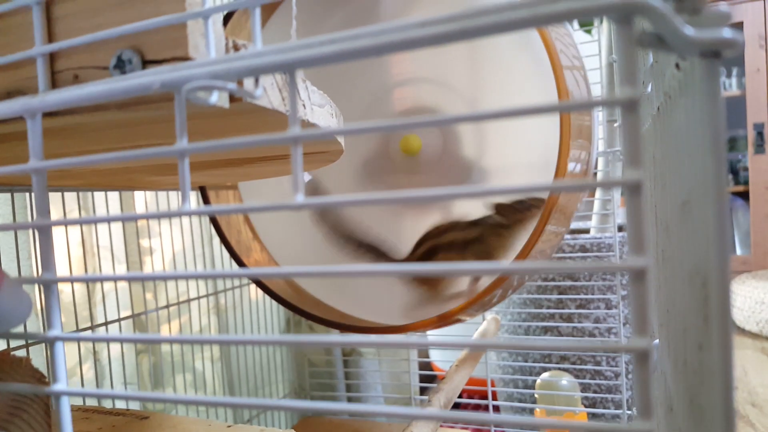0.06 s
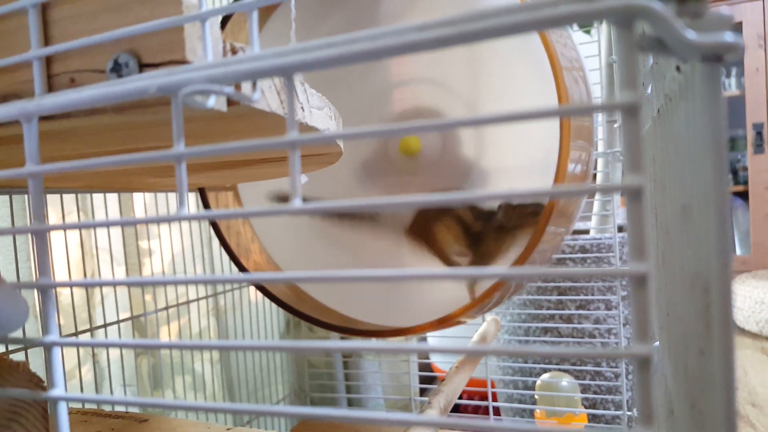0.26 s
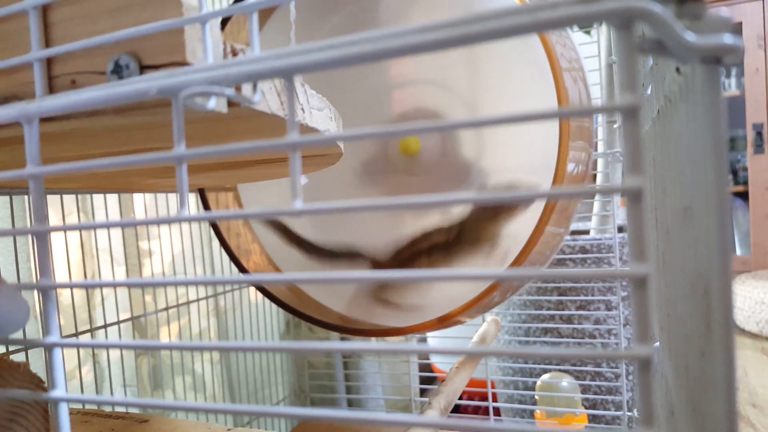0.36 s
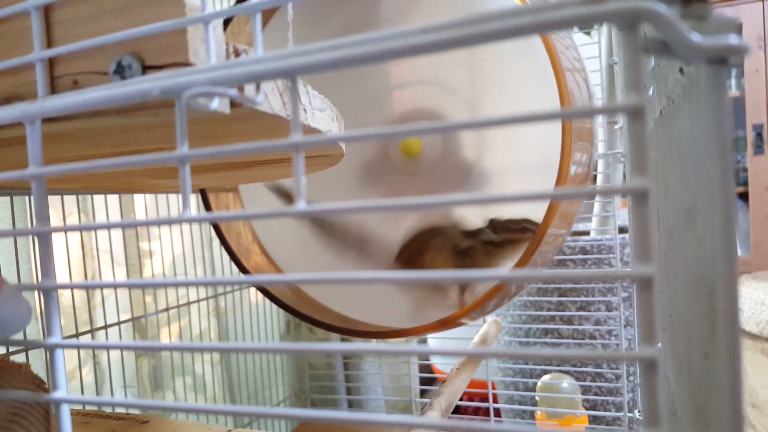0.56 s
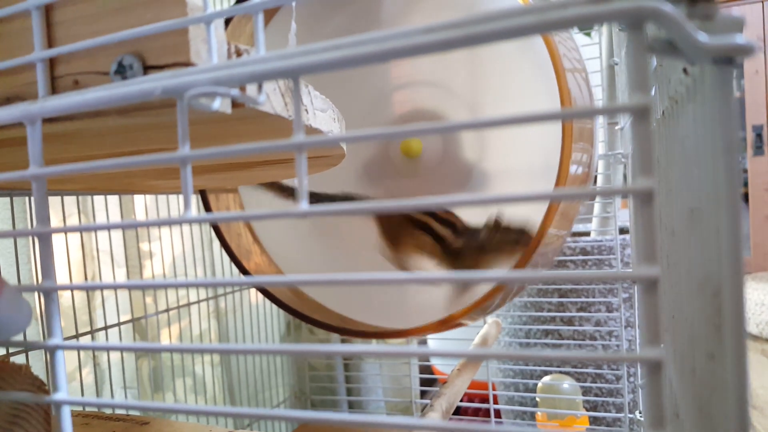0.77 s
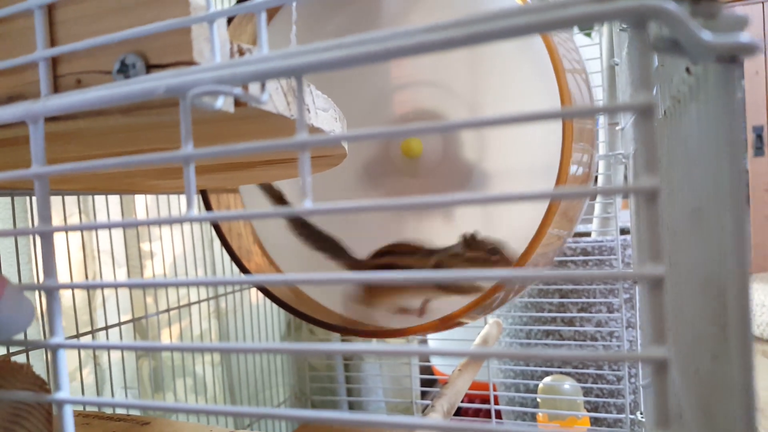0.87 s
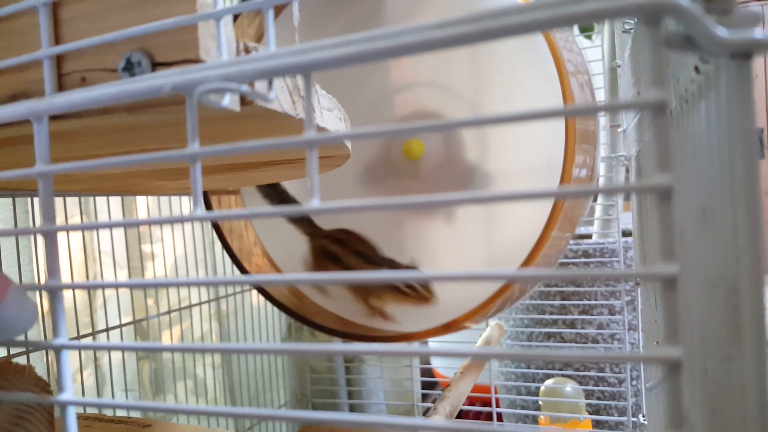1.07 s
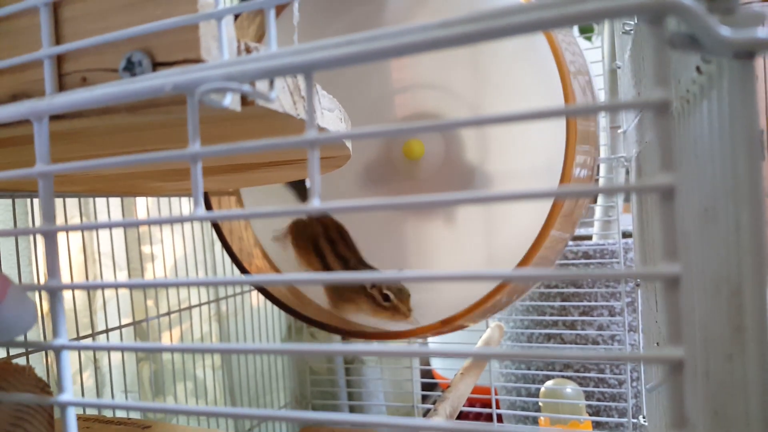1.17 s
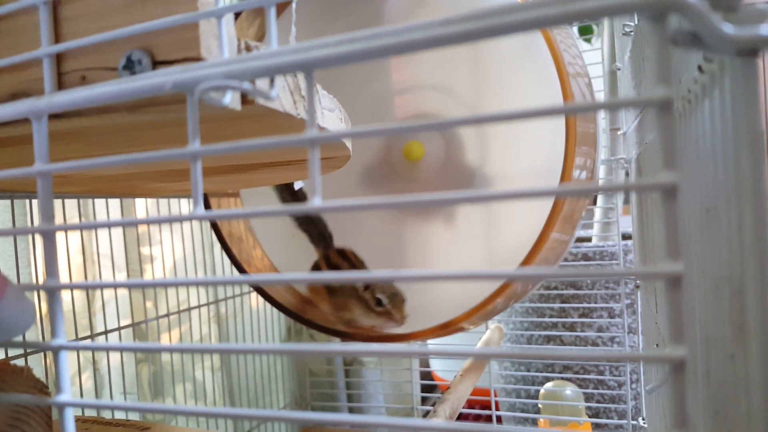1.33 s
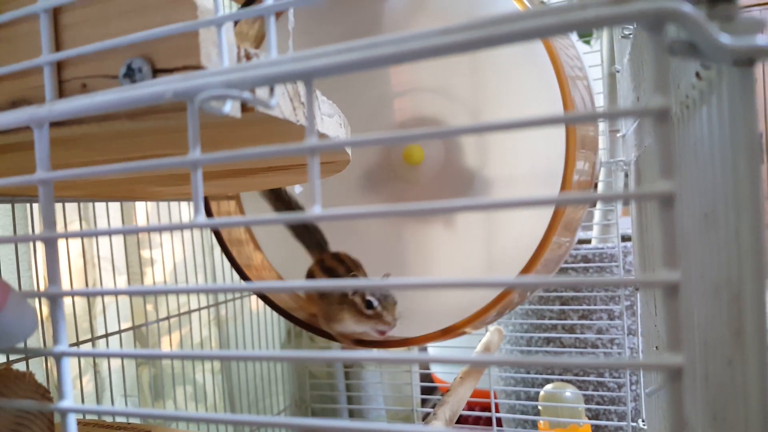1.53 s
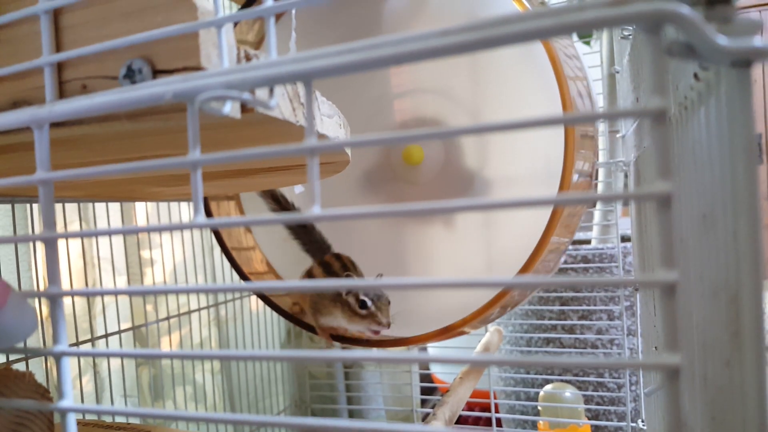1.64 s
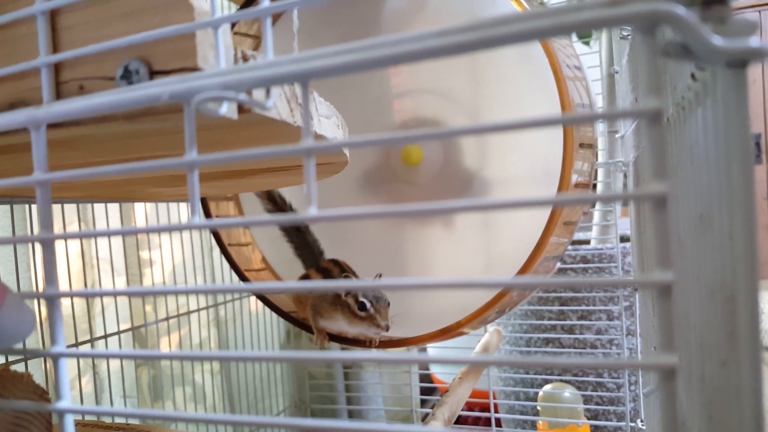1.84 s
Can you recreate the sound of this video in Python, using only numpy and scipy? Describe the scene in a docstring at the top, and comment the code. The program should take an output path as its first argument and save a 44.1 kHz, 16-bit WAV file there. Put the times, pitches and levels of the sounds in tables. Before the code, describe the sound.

A hollow exercise wheel rumbles from the start as a chipmunk runs in it, knocking unevenly on its loose axle, loudest at about 0.3 and 1.1 seconds, with soft thuds. Claws scratch and tap lightly throughout, and cage wires tinkle very faintly. Tiny dry axle squeaks come near 0.65 and 1.2 seconds. From 1.5 seconds the rumble fades, leaving a quiet room by about 1.9 seconds.

```python
"""A hollow exercise wheel rumbles and knocks on its loose axle as a chipmunk runs, then lets it coast.
Blows and bearing roughness excite the wheel's damped modes, one resonance hums, and landings thud.
Stick-slip friction at the axle gives short dry squeaks. Claws scratch the track and tap the rim,
the wires of the cage tinkle faintly in free vibration, and a small quiet room hums behind."""
import sys
import numpy as np
from scipy import signal
from scipy.fft import rfft, irfft
from scipy.io import wavfile
from scipy.ndimage import uniform_filter1d

SR = 44100
rng = np.random.default_rng(int(sys.argv[2]) if len(sys.argv) > 2 else 0)


def to_wav(sig):
    """Store sig (one row per channel, or 1-D mono) as 16-bit WAV at the path in sys.argv[1].

    Samples outside -1..1 are clipped; the rate is SR.
    """
    pcm = np.clip(np.atleast_2d(sig), -1, 1) * 32767
    pcm = np.round(pcm).astype(np.int16)
    wavfile.write(sys.argv[1], SR, pcm.T)  # frames by channels


N = 83790
TIME = np.arange(N) / SR


# wheel modes (frequency [Hz], gain [dB], base T60 [s], left minus right [dB], right lag [s])
WHEEL_MODES = [(165, -25.5, 0.12, -1, 0.0011), (310, -21.5, 0.13, -20.5, 0.0093),
               (347, -3.5, .14, 0, 0.00068), (396.5, 4, 0.095, 2.5, 0), (442.4, -3.5, 0.046, -3.5, 0),
               (517.7, -10, 0.17, 2, 0.0026), (839.5, -3, 0.095, -4, 0.0024), (1203, -21, 0.071, 4, 0),
               (1572, -17, 0.093, 5.5, 0.0083), (1907, -17.5, 0.065, 10.5, 0.004)]
def wheel_ring(overtones_db, t60_factor, rise_s, overtones_above_hz=700):
    """Modal superposition: the wheel's response to one blow is a sum of damped sinusoids."""
    out = 0
    for hz, db, t60, side_db, lag in WHEEL_MODES:
        t = np.maximum(TIME[:SR // 4] - np.array([[0], [lag]]), 0)
        level_db = db + overtones_db * (hz > overtones_above_hz) - 60 * t / (t60 * t60_factor)
        envelope = amp(level_db) * np.minimum(t / rise_s, 1)
        out = out + pan(side_db) * envelope * np.sin(2 * np.pi * hz * (t - rise_s))
    return out


# blows on the axle (time [s], level [dB], overtone gain [dB], T60 factor [ratio], rise [s])
AXLE_BLOWS = [(0.06, -47, 0, 0.41, 0.0031), (.089, -44, -3.5, 0.67, 0.0016),
              (.154, -39.5, -3.5, 1.02, 0.0025), (0.244, -38, -2.5, 0.5, 0.0033),
              (0.2811, -20.5, -8, 0.39, 0.0046), (0.2928, -34.5, 1.5, 0.8, 0.0047),
              (0.304, -34.5, 5.5, 0.94, 0.0043), (.317, -30, -8, 0.7, 0.0051),
              (.414, -45.5, 0, 0.58, 0.0029), (.423, -37.5, -31, 0.91, 0.0037),
              (.447, -37, -17, .65, .0043), (0.747, -41.5, -1, 0.67, 0.0032),
              (.779, -43, -8.5, 0.87, 0.0039), (.838, -34.5, -36, 0.83, 0.0074),
              (.9577, -33, 7, 0.66, 0.0044), (1.025, -51, 10.5, 0.89, .005), (1.077, -41, -6, 1.9, 0.00412),
              (1.107, -25.5, -0.5, 0.8, 0.0062), (1.127, -42, -5, 0.47, 0.0043),
              (1.221, -41.5, -15, 1.7, 0.0082), (1.242, -33.5, -20, 0.57, 0.00682),
              (1.309, -49, 0, .7, .004), (1.465, -51, 7.5, 0.78, 0.0044), (1.624, -48, 2, 0.8, 0.0061)]
def knocks():
    """Impact excitation: the running animal throws the wheel against its loose axle."""
    out = np.zeros((2, N))
    for s, db, overtones_db, t60_factor, rise_s in AXLE_BLOWS:
        add(out, s, amp(db) * wheel_ring(overtones_db, t60_factor, rise_s))
    return out


# envelope of the rumble (time [s], level [dB])
RUMBLE_LEVEL = [(0, -49), (.2, -47.5), (.4, -44), (.55, -48.5), (.75, -51), (.9, -48), (1.05, -51.5),
                (1.15, -45.5), (1.3, -54), (1.5, -52.5), (1.6, -61), (1.7, -61.5), (1.8, -70.5), (1.9, -82)]
# excitation by the rough bearing (frequency [Hz], relative level [dB])
BEARING_SPECTRUM = [(100, 6), (160, 0), (300, -2), (390, -7.5), (450, 4.5), (520, 3), (600, -0.5),
                    (850, -9), (1500, -2.5), (2000, -12.5)]
# rubbing of track and axle (frequency [Hz], relative spectral density [dB])
RUB_SPECTRUM = [(30, -29), (70, -4.5), (130, -7), (250, -10), (600, -2), (1000, -9), (1350, -4.5),
                (1700, 2.5), (2100, -4), (2450, -10), (2900, -11.5), (4500, -17.5), (7500, -24.5),
                (8500, -19), (10000, -33.5), (15500, -25)]
def rolling(rub_gain_db=-20.5, rub_db_per_db=0.75):
    """Forced vibration: dense bumps keep the wheel ringing, over friction noise that fades with it."""
    level_db = np.interp(TIME, *np.transpose(RUMBLE_LEVEL))
    bumps = colour(grains(per_s=1500, spread_db=2)[:1], BEARING_SPECTRUM)
    response = wheel_ring(overtones_db=0, t60_factor=0.72, rise_s=0.00097)
    rumble = signal.fftconvolve(bumps, response, axes=1)[:, :N]
    rumble /= np.sqrt(uniform_filter1d((rumble ** 2).mean(0), size=1100) + 1e-9)  # even out the power
    flutter = smooth_noise(samples=700)
    grit = grains(per_s=2500, spread_db=2.9) + rng.standard_normal((2, N))
    rub_db = rub_gain_db + rub_db_per_db * level_db + 1.73 * flutter
    rub = unit(diffuse(colour(grit, RUB_SPECTRUM))) * amp(rub_db)
    return rumble * amp(level_db + 1.1 * flutter) + pan(2.5) * rub


# swell and ebb of the wheel's hollow hum (time [s], level [dB])
HUM_LEVEL = [(.08, -66.5), (.17, -47.5), (.24, -63), (.42, -54), (.53, -59.5), (.61, -49.5), (.7, -56.5),
             (1.02, -65), (1.17, -52.5), (1.28, -68), (1.47, -65.5), (1.9, -75)]
def wheel_hum(centre_hz=518.3, width_hz=25):
    """Narrow-band resonance: one hollow mode of the wheel hums with a wandering pitch."""
    pole = np.exp(-np.pi * width_hz / SR)
    noise = rng.standard_normal(N + SR) + 1j * rng.standard_normal(N + SR)
    sway = signal.lfilter([1], np.poly([pole, pole]), noise)[SR:]
    sway /= np.sqrt(uniform_filter1d(abs(sway) ** 2, size=2600))
    hum = unit((sway * np.exp(2j * np.pi * centre_hz * TIME)).real)
    return pan(5.5) * hum * amp(np.interp(TIME, *np.transpose(HUM_LEVEL)))


# heavy landings (time [s], level [dB])
LANDINGS = [(.242, -59), (.3, -53), (.403, -41.5), (.49, -51.5), (.84, -54.5), (.957, -54.5),
            (1.076, -42.5), (1.105, -43), (1.465, -57.5)]
# dull thud (frequency [Hz], relative spectral density [dB])
THUD_SPECTRUM = [(35, -17), (75, -9.5), (165, 7), (250, 1), (500, -38)]
def thuds():
    """Soft impact: the animal's weight on the track gives bursts of low-frequency noise."""
    noise = unit(colour(rng.standard_normal((1, N)), THUD_SPECTRUM))
    return pan(3.9) * noise * strokes(LANDINGS, rise_s=0.012, fall_s=0.021)


# axle slips (time [s], centre pitch [Hz], level [dB], duration [s], rasp gain [dB])
AXLE_SLIPS = [(0.6497, 1850, -44, 0.015, -16), (.651, 1545, -42, 0.015, -18),
              (1.093, 1497, -41.5, 0.013, -23), (1.2088, 2090, -35, 0.009, -14.5),
              (1.221, 1940, -43, 0.0046, -16), (1.221, 1450, -42.5, 0.03, -28),
              (1.399, 2018, -47, 0.013, -7), (1.651, 2070, -50, .006, -9)]
# rasp of the axle (frequency [Hz], relative spectral density [dB])
RASP_SPECTRUM = [(900, -38), (1400, 1.5), (1900, 8), (2450, -10), (3050, 0), (4500, -15), (8000, -23)]
def squeaks(sag=0.1, jitter=0.039, octave_db=-35, right_lag_s=0.00044):
    """Stick-slip friction: the axle gives brief rasping tones that sag in pitch."""
    tones, rasp_envelope = np.zeros((2, N)), np.zeros((2, N))
    for s, hz, db, length, rasp_db in AXLE_SLIPS:
        progress = np.arange(0, length, 1 / SR) / length
        wobble = smooth_noise(samples=25)[:len(progress)]
        pitch = hz * (1 - sag * (progress - .5) + jitter * wobble)
        phase = 2 * np.pi * (np.cumsum(pitch) / SR - hz * np.array([[0], [right_lag_s]]))
        arch = pan(6) * amp(db) * abs(np.sin(np.pi * progress)) ** 0.46
        add(tones, s, arch * (np.sin(phase) + amp(octave_db) * np.sin(2 * phase)))
        add(rasp_envelope, s, arch * amp(rasp_db))
    return tones + colour(rasp_envelope * rng.standard_normal((2, N)), RASP_SPECTRUM)


# claw strokes (time [s], wooden tap gain [dB], scratch gain [dB], fine fizz gain [dB])
CLAW_STROKES = [(.001, -54.5, -54.5, -65), (.09, -45.5, -52, -71), (.12, -45.5, -51.5, -55.5),
                (.214, -54, -53.5, -63), (.284, -60, -50.5, -61), (.306, -45, -54, -76),
                (.351, -49.5, -52.5, -71), (.383, -46.5, -51.5, -62), (.406, -59, -53.5, -61),
                (.426, -58, -54, -66), (.458, -55, -56, -61), (.566, -51, -57.5, -65),
                (.638, -53, -57.5, -57), (.652, -48, -55, -57), (.729, -51, -60, -74),
                (.781, -62, -58.5, -67), (.914, -50, -54, -63), (.984, -48, -53.5, -62),
                (1.044, -62, -57, -54.5), (1.078, -50, -76, -77), (1.123, -54, -52.5, -58.5),
                (1.156, -51, -65, -73), (1.212, -49, -51, -65), (1.306, -46, -50.5, -60),
                (1.369, -55.5, -64, -67), (1.401, -64, -55.5, -73), (1.416, -70, -67, -57),
                (1.453, -76, -69, -68), (1.466, -48.5, -55, -66), (1.479, -52, -57, -67),
                (1.493, -57, -56, -58), (1.552, -60, -61, -68), (1.627, -50.5, -60.5, -68)]
# the three parts of a stroke (frequency [Hz], relative spectral density [dB])
TAP_SPECTRUM = [(200, -7), (700, -1), (1000, -8), (1350, -5), (1600, 2), (2050, -1), (2450, -17.5),
                (2900, -12.5), (4000, -28), (8000, -36)]
SCRATCH_SPECTRUM = [(1000, -36), (2400, 11), (3200, 2), (4500, 1.5), (5800, -4), (6600, -2), (7600, -8),
                    (8600, 0.5), (9800, -18), (15000, -44)]
FIZZ_SPECTRUM = [(3000, -21), (7000, -6), (10000, -2), (12500, 6.5), (15500, -0.5)]
def claws():
    """Sliding friction: each skidding claw sheds a shower of tiny clicks, the finest dying first."""
    out, rows = np.zeros((2, N)), np.array(CLAW_STROKES)
    parts = [(TAP_SPECTRUM, 4.5, 0.009, 1.5), (SCRATCH_SPECTRUM, 1.2, 0.009, 1.5),
             (FIZZ_SPECTRUM, 0.8, 0.0045, -3)]
    for column, (spectrum, side_db, fall_s, spread_db) in enumerate(parts, start=1):
        clicks = unit(grains(per_s=3000, spread_db=spread_db) + rng.standard_normal((2, N)))
        flutter = amp(1.5 * smooth_noise(samples=200))
        envelope = strokes(rows[:, [0, column]], rise_s=0.003, fall_s=fall_s, hold_s=0.005)
        out += pan(side_db) * colour(clicks * flutter * envelope, spectrum)
    return amp(-1.5) * diffuse(out)


# claw tips striking the rim (time [s], level [dB])
RIM_HITS = [(.0908, -47), (.5695, -60.5), (1.2935, -55.5), (1.615, -58.5)]
# rim modes (frequency [Hz], gain [dB], T60 [s])
RIM_MODES = [(1094, -5.5, 0.057), (1963, -2, 0.093), (2813, -6, .07), (3018, -9, 0.065)]
def rim_taps():
    """Hard impact: a claw tip sets the rim's modes ringing crisply."""
    return pan(3.3) * struck(RIM_HITS, RIM_MODES)


# a claw catching a wire (time [s], level [dB])
WIRE_PLUCKS = [(1.3065, -59)]
# modes of the taut wire (frequency [Hz], gain [dB], T60 [s])
TAUT_MODES = [(4097, -6, 0.059), (5275, -4, 0.037), (8230, 0, 0.087)]
def wire_pluck():
    """Free vibration: a taut wire released by a claw rings at its natural frequencies."""
    return struck(WIRE_PLUCKS, TAUT_MODES)


# rattles of the cage (time [s], level [dB])
CAGE_RATTLES = [(0.216, -63), (0.456, -55), (1.453, -59)]
# cage wire modes (mean frequency [Hz], gain [dB], T60 [s])
CAGE_MODES = [(4560, 7.5, 0.11), (6320, -3, 0.17), (8460, -8, 0.11), (8750, 1, .1), (13400, -1, 0.17)]
def cage_tinkle(detune_hz=170, wire_count=6):
    """Beating: shaken cage wires ring thinly, each slightly out of tune with the next."""
    out, t = np.zeros((2, N)), TIME[:SR // 3]
    for s, db in CAGE_RATTLES:
        for hz, mode_db, t60 in CAGE_MODES:
            detune, phase = rng.standard_normal((2, 2, wire_count, 1))
            ring = np.sin(2 * np.pi * ((hz + detune_hz * detune) * t + phase)).mean(1)
            add(out, s, amp(db + mode_db - 60 * t / t60) * ring)
    return out


# still air of the room (frequency [Hz], relative spectral density [dB])
AIR_SPECTRUM = [(33, -38), (44, -8), (55, -9), (100, -3.5), (200, -11.5), (500, -12), (1000, -19),
                (2000, -16.5), (4000, -27), (9000, -33), (15500, -32)]
def room_tone(air_db=-64.5, hum_hz=44, hum_db=-66.5):
    """Ambient noise floor: diffuse broadband noise and a low pure tone."""
    air = unit(diffuse(colour(rng.standard_normal((2, N)), AIR_SPECTRUM)))
    return pan(0.7) * (amp(air_db) * air + amp(hum_db) * np.sin(2 * np.pi * hum_hz * TIME))


# reverberation time of the room (frequency [Hz], T60 [s])
ROOM_T60 = [(150, 0.24), (1000, 0.27), (4000, 0.15), (14000, 0.08)]
def in_room(x, wet_db):
    """Reverberation: dense reflections decay exponentially, fastest in the treble."""
    reflections = rng.standard_normal((2, SR // 2)) * (TIME[:SR // 2] > .004)
    hz, t, spectra = signal.stft(reflections, SR, nperseg=256)
    tail = signal.istft(spectra * amp(-60 * t / read(ROOM_T60, hz)[:, None]), SR, nperseg=256)[1]
    wet = signal.fftconvolve(x, tail / np.linalg.norm(tail[0]), axes=1)[:, :N]
    return x + amp(wet_db) * diffuse(wet)


# left-right likeness of diffuse sound (frequency [Hz], correlation [-1 to 1])
CORRELATION = [(40, 0.97), (200, 0.58), (500, 0.76), (1100, 0.01), (1700, -.2), (3000, 0.04), (15000, 0)]
def diffuse(x):
    """Diffuse-field coherence: long waves reach both channels nearly alike."""
    left, right = rfft(x)
    same = np.clip(read(CORRELATION, np.fft.rfftfreq(N, 1 / SR)), -1, 1)
    return irfft(np.array([left, same * left + np.sqrt(1 - same ** 2) * right]), N)


def struck(hits, modes):
    """Impulse response: each hit starts exponentially damped modes at random phases."""
    out = np.zeros((2, N))
    for s, db in hits:
        for hz, mode_db, t60 in modes:
            phase = 2 * np.pi * rng.random() + 2 * rng.random((2, 1))
            add(out, s, amp(db + mode_db - 60 * TIME / t60) * np.sin(2 * np.pi * hz * TIME + phase))
    return out


def strokes(rows, rise_s, fall_s, hold_s=0):
    """Incoherent addition: envelopes that rise, hold and decay are summed in power."""
    power = np.zeros(N)
    for s, db in rows:
        t = np.maximum(TIME - s, 0)
        decay = np.exp(-np.maximum(t - hold_s, 0) / fall_s)
        power += (amp(db) * np.minimum(t / rise_s, 1) * decay) ** 2
    return np.sqrt(power)


def grains(per_s, spread_db):
    """Shot noise: tiny random impacts, simultaneous in both channels."""
    size = amp(spread_db * np.minimum(rng.exponential(1, N), 3))
    occurs = rng.random(N) < per_s / SR
    return unit(size * occurs * rng.standard_normal((2, N)))


def smooth_noise(samples):
    """Random modulation: a moving average of white noise, at unit RMS."""
    return unit(uniform_filter1d(rng.standard_normal(N), size=samples))


def colour(x, spectrum, size=4096):
    """Minimum-phase filtering: imposes a spectrum at unit power gain."""
    log_gain = np.log(amp(read(spectrum, abs(np.fft.fftfreq(size, 1 / SR)))))
    taps = np.fft.ifft(np.exp(np.conj(signal.hilbert(log_gain)))).real[:size // 2]
    return signal.fftconvolve(x, taps[None] / np.linalg.norm(taps), axes=1)[:, :N]


def read(points, hz):
    """Interpolation on a log-frequency axis."""
    point_hz, value = np.transpose(points)
    return np.interp(np.log(hz + 1), np.log(point_hz + 1), value)


def amp(db):
    """Amplitude ratio from decibels."""
    return 10 ** (np.asarray(db) / 20)


def unit(x):
    """Normalisation to unit RMS."""
    return x / np.sqrt(np.mean(x ** 2) + 1e-20)


def pan(db):
    """Level panning: channel gains for a left-minus-right difference in dB."""
    return amp(np.array([[db / 2], [-db / 2]]))


def add(mix, s, sound):
    """Superposition of a stereo sound, starting at s seconds."""
    part = mix[:, max(round(s * SR), 0):][:, :sound.shape[1]]
    part += sound[:, :part.shape[1]]


def scene():
    """Linear superposition of wheel, claws, cage and room."""
    feet = claws() + rim_taps() + wire_pluck()
    wheel = in_room(knocks() + thuds(), wet_db=-16) + rolling() + wheel_hum()
    return wheel + in_room(feet, wet_db=-6) + in_room(squeaks(), wet_db=-12) + cage_tinkle() + room_tone()


def record(dry, cutoff_hz=15850):
    """Band limiting: a steep low-pass filter removes the highest treble."""
    lowpass = signal.firwin(511, cutoff_hz, window=("kaiser", 9), fs=SR)
    return signal.oaconvolve(dry, lowpass[None], "same")


dry = scene()
out = record(dry)
to_wav(out)
```